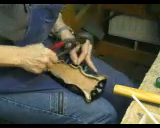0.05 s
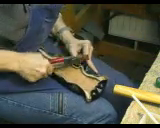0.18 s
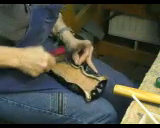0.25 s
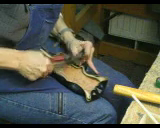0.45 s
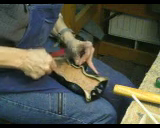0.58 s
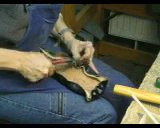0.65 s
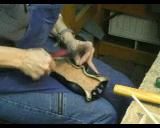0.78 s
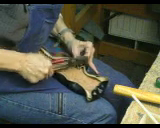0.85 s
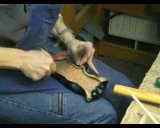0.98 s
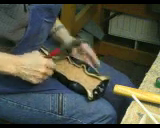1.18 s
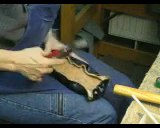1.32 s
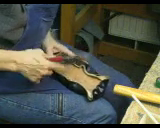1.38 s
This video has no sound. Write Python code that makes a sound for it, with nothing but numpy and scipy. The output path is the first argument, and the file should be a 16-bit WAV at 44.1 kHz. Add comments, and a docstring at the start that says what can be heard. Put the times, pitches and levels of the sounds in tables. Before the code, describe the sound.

A hammer drives a tack into a shoe sole with five quick blows. The first ones ring and thud, the later ones knock hollow. Faint tool ticks fall between them, and cloth rustles softly in a small, quiet workshop.

```python
"""Tacking a shoe sole

A hammer drives a tack into a shoe held on the lap: five quick blows in a small, quiet workshop.
The first rings the tack and thuds into the lap; as the tack sinks, the sole takes the blow and
knocks hollow. The room booms briefly, the tool ticks in the hand between blows, and cloth rustles
at the end. A narrow-band recorder squashes the peaks and dulls the top."""
import sys
import numpy as np
from scipy import signal
from scipy.fft import rfft, irfft, next_fast_len
from scipy.io import wavfile

SR = 44100
rng = np.random.default_rng(int(sys.argv[2]) if len(sys.argv) > 2 else 0)


def put_to_file(sound):
    """Save the sound as 16-bit audio at rate SR, in the file named by the first command-line argument."""
    columns = np.atleast_2d(sound).T  # one column per channel
    safe = np.clip(columns, -1, 1)
    whole_steps = np.round(safe * 32767)
    wavfile.write(sys.argv[1], SR, whole_steps.astype(np.int16))


N = 63945

# The five hits. Each row: start in seconds, lap thud in dB, sole in dB, sole pitch in Hz, rim in dB,
# hammer clack in dB, clack pitch in Hz, tack ring in dB, crack in dB.
HAMMER_HITS = [(0.2013, -14.5, -19, 735, -44, -18, 1625, -10, -27.5),
               (0.4337, -9.5, -6, 705, -42, -12.5, 1672, -9, -19),
               (0.6563, -11, -2.5, 553.5, -12.5, -7, 1706, -4.5, -21),
               (0.8638, -17.5, -0.5, 622, -44.5, -10, 1737, -13, -26.5),
               (1.0504, -17.5, 0, 642, -20, -9, 1700, -16.5, -27)]


def hammer():
    """The five blows in turn."""
    return sum(delayed(blow(index, *hit), start) for index, (start, *hit) in enumerate(HAMMER_HITS))


# The shoe bouncing on the lap, the sole's stiff rim, and the tack's ping.
# Each row: frequency in Hz, level in dB, ring time to -60 dB in seconds.
LAP_MODES = [(74.6, -8.5, 0.067), (143, 2, 0.034), (313, -17, 0.025)]
RIM_MODES = [(878, -1.5, 0.027), (994, -3.5, .018)]
TACK_MODES = [(2423, -2, 0.0054), (3050, 0, 0.0078), (3554, -1.5, 0.0072), (3962, -4.5, .007),
              (4980, -5.5, 0.0056)]
# The sole's hollow knock, and the clack of the hammer head on it.
# Each row: multiple of the hit's pitch, level in dB, ring time to -60 dB in seconds.
SOLE_MODES = [(.38, -12.5, .016), (.68, -3, 0.0083), (1.0, 1.5, 0.014), (1.17, -9.5, 0.017)]
CLACK_MODES = [(1.0, 1.5, 0.0091), (1.2, 1.5, 0.012), (1.44, -8, 0.0078), (1.93, -8.5, 0.002),
               (2.7, -6, 0.0074)]
# The tack buzzing while it stands clear of the sole, and the crack of contact.
# Each row: frequency in Hz, level in dB.
BUZZ_EQ = [(1200, -24.5), (2000, -9), (2400, 2), (2950, -4), (3800, -6), (5000, -15.5), (7000, -25)]
CRACK_EQ = [(200, -4.5), (600, -5), (1100, -3), (1800, 1), (3200, 1), (5000, -4), (7000, -13)]


def blow(index, thud_db, sole_db, sole_hz, rim_db, clack_db, clack_hz, tack_db, crack_db):
    """One blow and its echoes: steel clicks at once, sole and lap give way a little more slowly."""
    sink_db = 9  # buzz lost with each blow as the tack goes in
    crack_send_db = 15.5  # the crack spreads more into the room than towards the microphone
    thud = amp(thud_db) * rise(seconds=0.0014) * ring(LAP_MODES)
    knock = amp(sole_db) * ring(SOLE_MODES, sole_hz) + amp(rim_db) * ring(RIM_MODES)
    sole = rise(seconds=0.00079) * knock
    steel = amp(clack_db) * ring(CLACK_MODES, clack_hz) + amp(tack_db) * ring(TACK_MODES)
    buzz = amp(-27.5 - sink_db * index) * fade(t60=0.21) * noise(BUZZ_EQ)
    crack = amp(crack_db) * fade(t60=0.014) * noise(CRACK_EQ)
    body = thud - sole - steel  # sole and steel push opposite to the thud
    return body + buzz + crack + workshop(body + amp(crack_send_db) * crack)


def ring(modes, pitch=1):
    """Damped modes struck at once, neighbours in opposite phase."""
    return sum((-1) ** k * amp(db) * fade(t60) * np.sin(2 * np.pi * hz * pitch * clock())
               for k, (hz, db, t60) in enumerate(modes))


# Handling ticks. Each row: start in seconds, level in dB.
TICK_CUES = [(0.0165, -35), (0.0262, -32), (0.0864, -33), (0.1053, -32.5), (0.1467, -30.5), (0.1622, -30),
             (0.1749, -36.5), (0.5987, -32.5), (0.6174, -33.5), (0.644, -34.5), (0.7567, -33.5),
             (0.7767, -30), (0.8096, -29.5), (1.0302, -33)]
# Their thin, bright tone. Each row: frequency in Hz, level in dB.
TICK_EQ = [(300, -29), (2300, -8.5), (3050, 3.5), (3800, 0.5), (5200, -6), (7000, -5.5)]


def tool_ticks():
    """The tool clicks lightly in the hand, and the room answers."""
    envelope = sum(amp(db) * delayed(fade(t60=0.014), start) for start, db in TICK_CUES)
    clicks = noise(TICK_EQ) * envelope
    return clicks + workshop(clicks)


# Sleeve strokes. Each row: peak time in seconds, half length in seconds, level in dB.
SLEEVE_CUES = [(1.18, .025, -47.5), (1.322, 0.053, -43.5)]
# The swish of cloth and the shoe's dull bump. Each row: frequency in Hz, level in dB.
CLOTH_EQ = [(80, -0.5), (350, -15), (620, 2), (1100, -6), (1700, -4.5), (3000, -4), (5000, -8), (7000, -13)]
BUMP_EQ = [(60, -20), (130, -1.5), (200, -7), (300, -9), (900, -44), (3000, -65.5)]


def sleeve_and_shoe():
    """After the last blow the sleeve brushes the apron and the shoe shifts with a soft bump."""
    rustle = noise(CLOTH_EQ) * sum(swell(*cue) for cue in SLEEVE_CUES)
    bump = noise(BUMP_EQ) * swell(peak_s=1.24, half_s=0.021, db=-45)
    return rustle + bump


# Slaps off near surfaces. Each row: delay in seconds, level in dB.
EARLY_ECHOES = [(.0045, -31.5), (.0098, -24.5), (0.0177, -35.5)]
# The room's boom. Each row: frequency in Hz, gain in dB, ring time to -60 dB in seconds.
STANDING_WAVES = [(70.7, 5, .25), (118.8, -1, 0.13), (144, -1, 0.31), (172, -0.5, 0.31), (258.5, 6.5, 0.2),
                  (310, 8.5, .36), (429.5, -1.5, 0.24), (585, -7, 0.27), (742.5, -2.5, 0.23)]
# Length of the reverb tail. Each row: frequency in Hz, time to -60 dB in seconds.
TAIL_DECAY = [(100, 0.62), (600, 0.41), (2000, 0.35), (5000, 0.41)]
# Colour of the tail. Each row: frequency in Hz, level in dB relative to the direct sound.
TAIL_EQ = [(60, -14.5), (150, -10), (350, -4), (650, -11), (1100, -3.5), (2000, -15.5), (3200, -16),
           (5000, -17)]


def workshop(sound):
    """The echoes of a sound: near surfaces, standing waves and a short diffuse tail."""
    hz, t, bands = signal.stft(rng.standard_normal(N), SR, nperseg=256)
    t60 = along(TAIL_DECAY, hz)[:, None]
    equal_energy = np.sqrt(2 * np.log(1000) / (t60 * SR))
    decay = np.exp(-np.log(1000) * t / t60) * equal_energy
    tail = signal.istft(bands * decay, SR, nperseg=256)[1][:N]
    tail = equalise(tail, TAIL_EQ)
    # Bench and shelves close by scatter a short burst.
    scatter = amp(-18.5) * unit(rng.standard_normal(N) * fade(t60=0.07)) / np.sqrt(N)
    boom = sum(amp(db) * 2 * np.log(1000) / (life * SR) * fade(life) * np.cos(2 * np.pi * f * clock())
               for f, db, life in STANDING_WAVES)
    response = delayed(tail + scatter + boom, EARLY_ECHOES[0][0])  # starts with the first slap
    slaps = sum(amp(db) * delayed(sound, delay) for delay, db in EARLY_ECHOES)
    return signal.fftconvolve(sound, response)[:N] + slaps


# Steady room air and low rumble. Each row: frequency in Hz, level in dB.
AIR_EQ = [(25, 5), (60, 5), (110, -1), (250, -2.5), (420, -12), (565, -3), (660, -4.5), (810, -1),
          (1050, -9), (1350, -6.5), (1580, -4), (2000, -8.5), (3100, -9), (5200, -14), (7000, -13.5)]
RUMBLE_EQ = [(10, -4.5), (22, -4), (31, -6.5), (42, -4), (70, -14.5), (150, -43), (500, -81.5)]
# The rumble's fader ride. Each row: time in seconds, level in dB.
RUMBLE_RIDE = [(0, -60), (.2, -66), (.6, -54.5), (.85, -59), (.98, -38.5), (1.1, -43.5), (1.25, -46),
               (1.44, -50)]
# A faint whine. Each row: centre in Hz, width in Hz, level in dB.
WHINE_BANDS = [(562, 4.3, -60.5), (827, 20, -70.5), (1616, 15, -62)]


def room_tone():
    """Steady air and a whine of narrow noise bands, over a rumble that swells near the last blow."""
    whine = 0
    for centre, width, db in WHINE_BANDS:
        band = filtered(rng.standard_normal(N), lambda hz: 1 / (1 + (2 * (hz - centre) / width) ** 2))
        whine += amp(db) * unit(band)
    air = amp(-46.5) * noise(AIR_EQ)
    rumble_db = np.interp(clock(), *np.transpose(RUMBLE_RIDE))
    return air + whine + amp(rumble_db) * noise(RUMBLE_EQ)


def amp(db):
    """Decibels to gain."""
    return 10 ** (np.asarray(db) / 20)


def unit(x):
    """Scale to rms 1."""
    return x / np.sqrt(np.mean(x ** 2) + 1e-20)


def along(points, hz):
    """Read a curve of (Hz, value) points on a log frequency axis."""
    freqs, values = np.transpose(points)
    return np.interp(np.log(hz + 1), np.log(freqs + 1), values)


def clock():
    """The time of every sample in seconds."""
    return np.arange(N) / SR


def rise(seconds):
    """A soft attack with this time constant."""
    return 1 - np.exp(-clock() / seconds)


def fade(t60):
    """Decay by 60 dB in t60 seconds."""
    return np.exp(-np.log(1000) * clock() / t60)


def swell(peak_s, half_s, db):
    """A bell-shaped rise and fall."""
    return amp(db) * np.exp(-((clock() - peak_s) / half_s) ** 2)


def delayed(x, seconds):
    """Move a sound later."""
    return np.pad(x, (max(round(seconds * SR), 0), 0))[:N]


def filtered(x, response):
    """Apply a gain that depends on frequency."""
    size = next_fast_len(N + SR // 2)
    return irfft(rfft(x, size) * response(np.fft.rfftfreq(size, 1 / SR)), size)[:N]


def equalise(x, eq):
    """Shape a sound with a curve of (Hz, dB) points."""
    return filtered(x, lambda hz: amp(along(eq, hz)))


def noise(eq):
    """Coloured noise of rms 1."""
    return unit(equalise(rng.standard_normal(N), eq))


def scene():
    """Everything at one microphone."""
    return (hammer() + tool_ticks() + sleeve_and_shoe() + room_tone())[None]


# The recorder's steep treble roll-off. Each row: frequency in Hz, gain in dB.
RECORDER_EQ = [(4700, 0), (5250, -0.5), (5650, -4.5), (5950, -13.5), (6400, -45.5), (7000, -85)]


def record(dry):
    """A narrow-band recorder: its input saturates, the treble is cut, and any peak left over clips."""
    saturation_level, clip_level, top_hz = 0.64, 0.65, 16800
    saturated = dry[0] / (1 + np.abs(dry[0] / saturation_level) ** 6) ** (1 / 6)
    clipped = np.clip(equalise(saturated, RECORDER_EQ), -clip_level, clip_level)
    return filtered(clipped, lambda hz: hz < top_hz)[None]


dry = scene()
out = record(dry)
put_to_file(out)
```